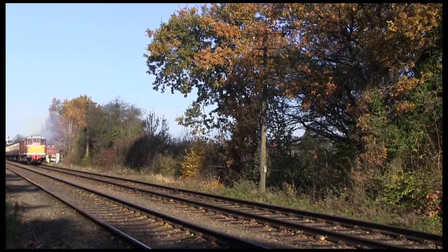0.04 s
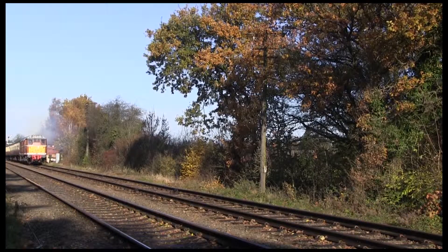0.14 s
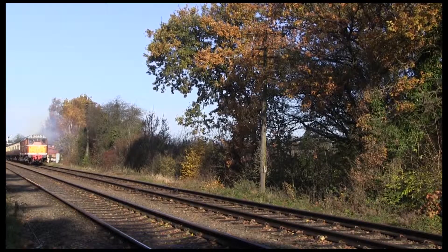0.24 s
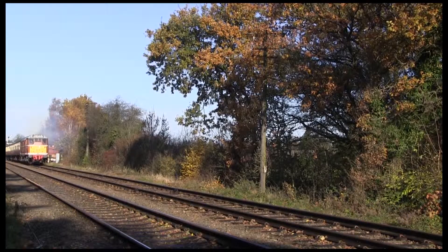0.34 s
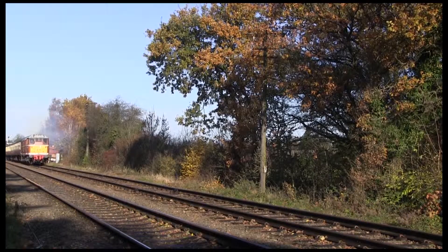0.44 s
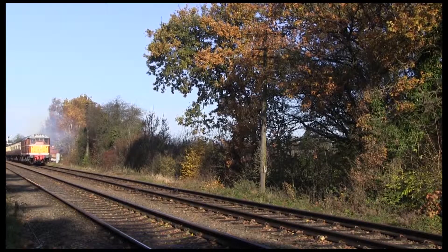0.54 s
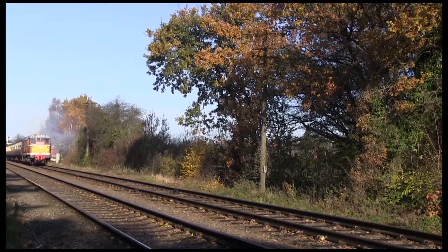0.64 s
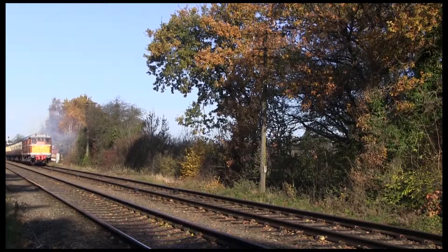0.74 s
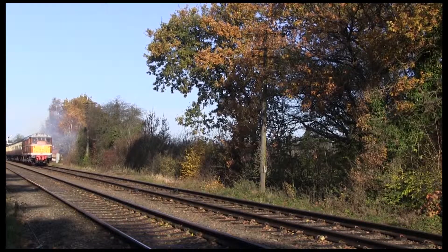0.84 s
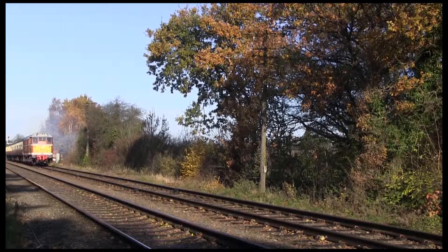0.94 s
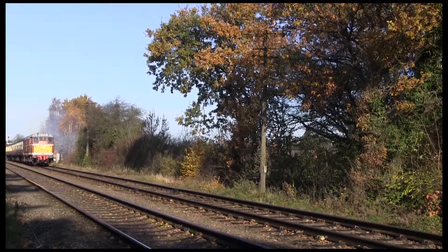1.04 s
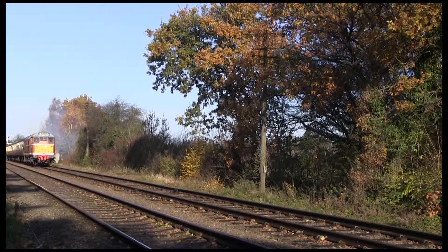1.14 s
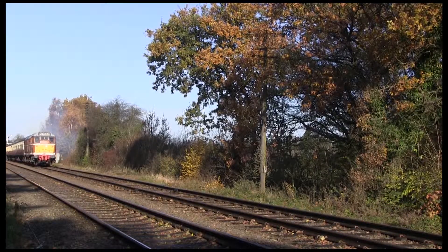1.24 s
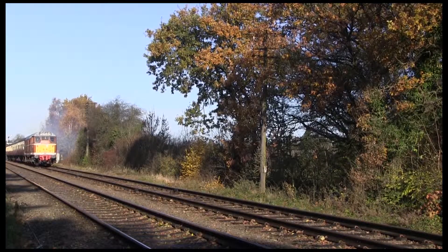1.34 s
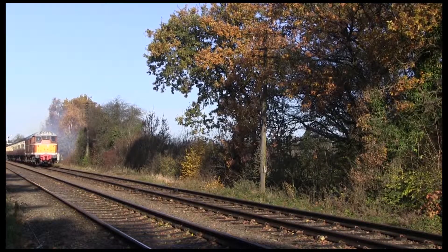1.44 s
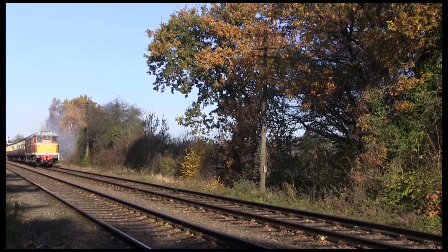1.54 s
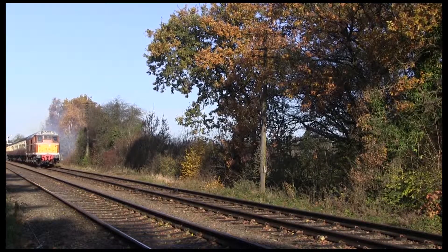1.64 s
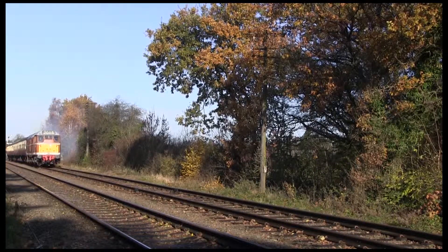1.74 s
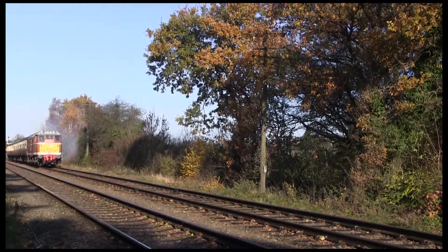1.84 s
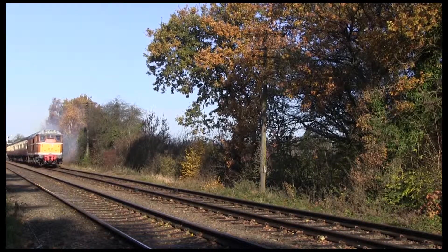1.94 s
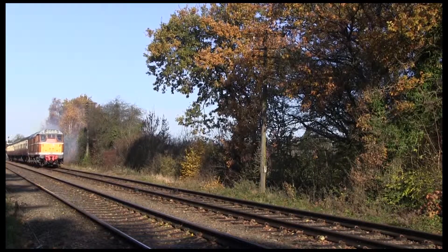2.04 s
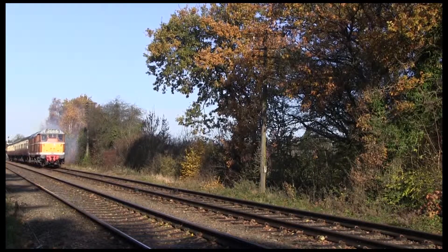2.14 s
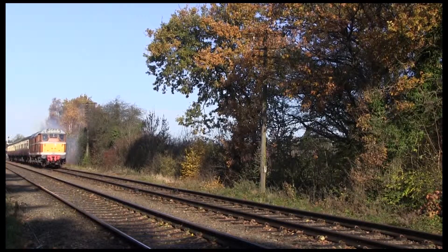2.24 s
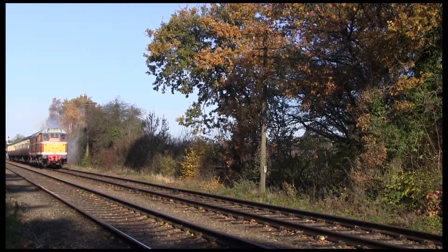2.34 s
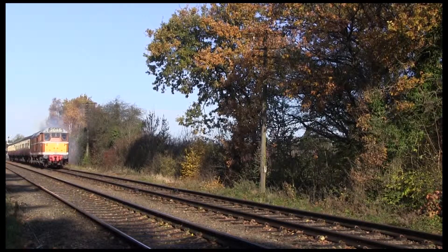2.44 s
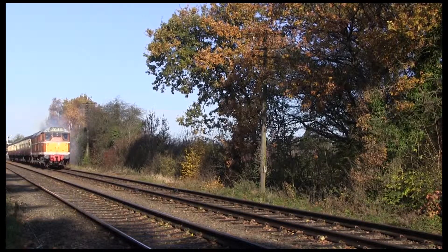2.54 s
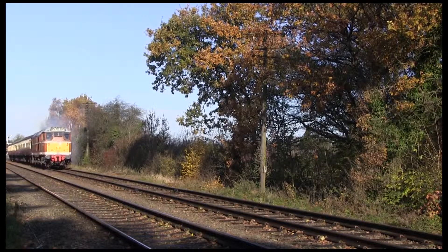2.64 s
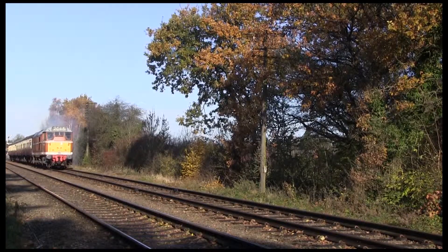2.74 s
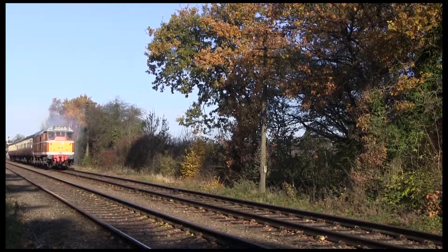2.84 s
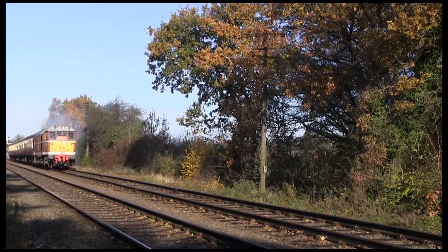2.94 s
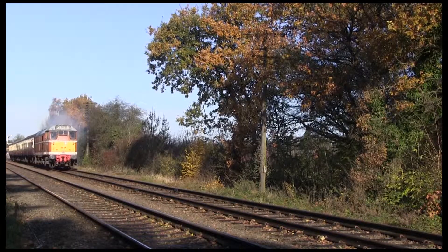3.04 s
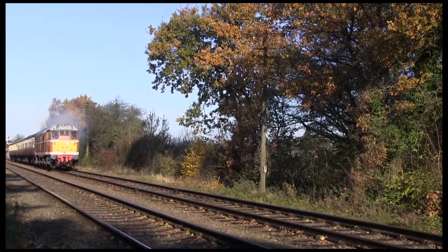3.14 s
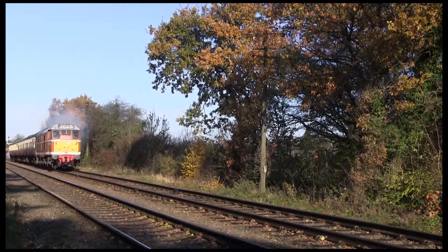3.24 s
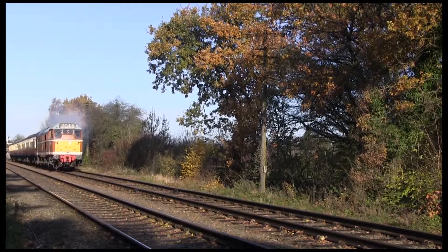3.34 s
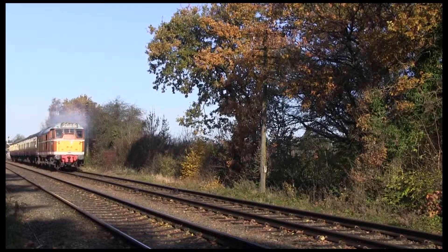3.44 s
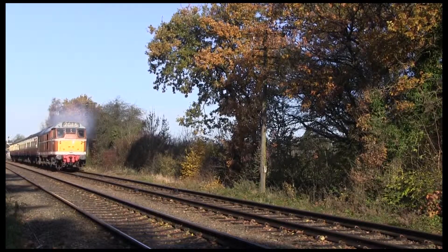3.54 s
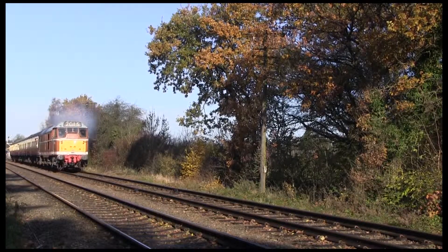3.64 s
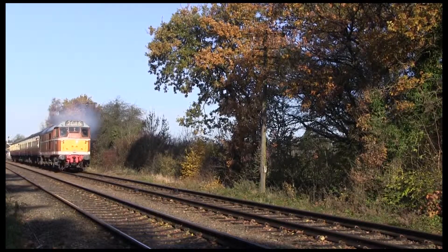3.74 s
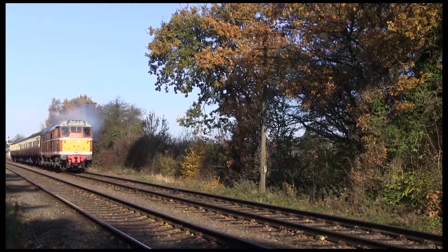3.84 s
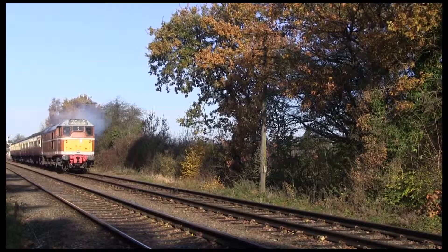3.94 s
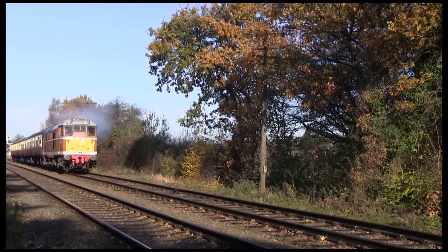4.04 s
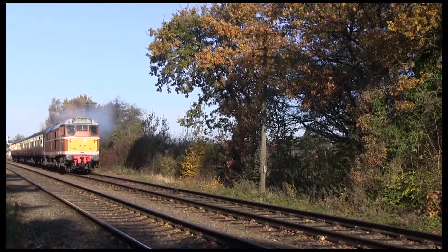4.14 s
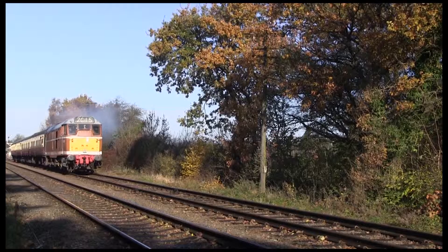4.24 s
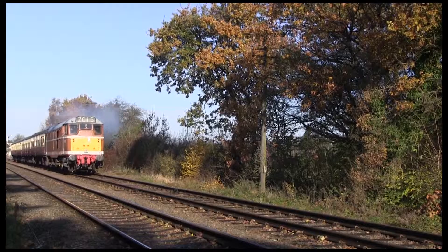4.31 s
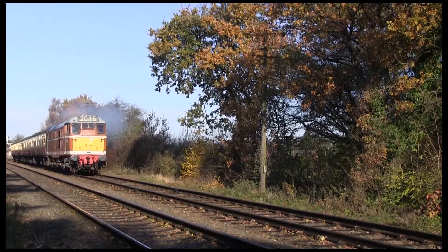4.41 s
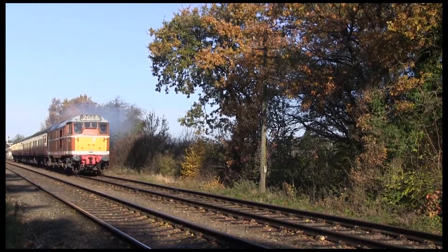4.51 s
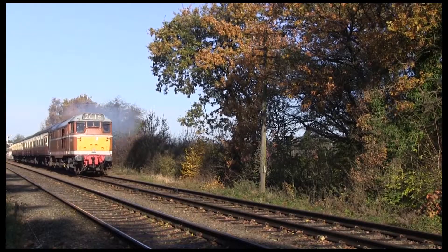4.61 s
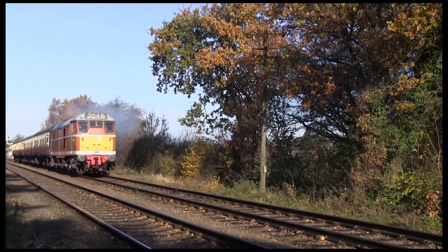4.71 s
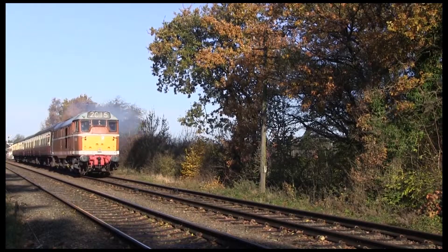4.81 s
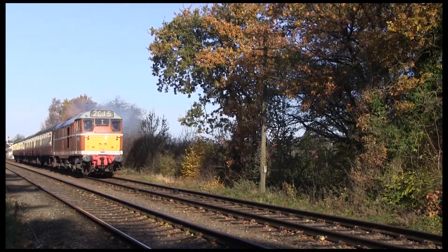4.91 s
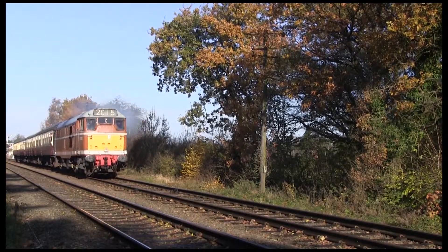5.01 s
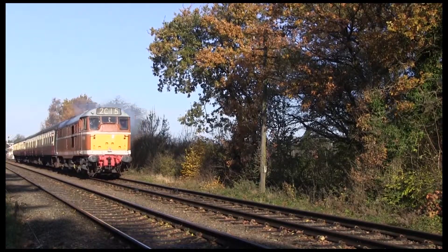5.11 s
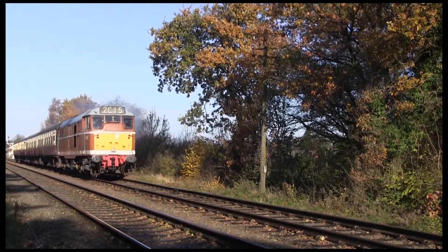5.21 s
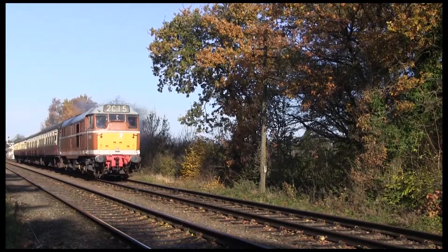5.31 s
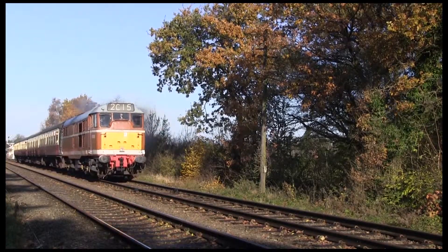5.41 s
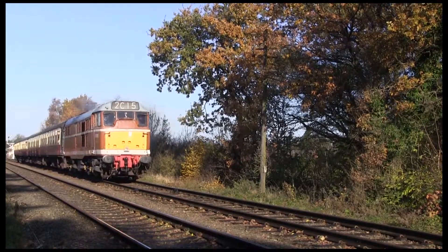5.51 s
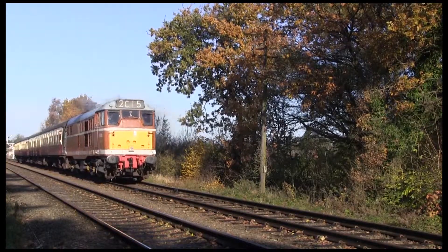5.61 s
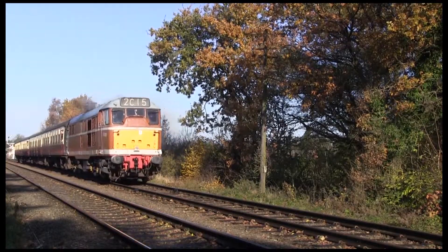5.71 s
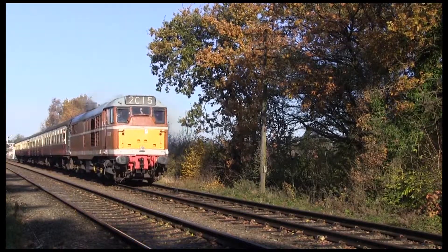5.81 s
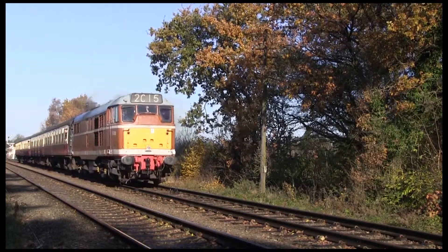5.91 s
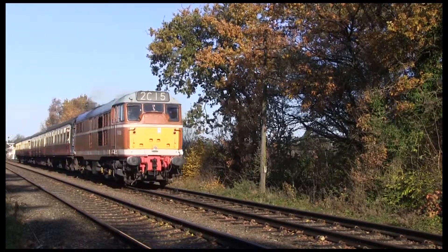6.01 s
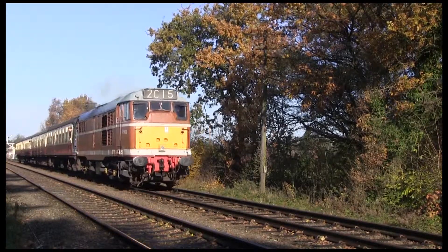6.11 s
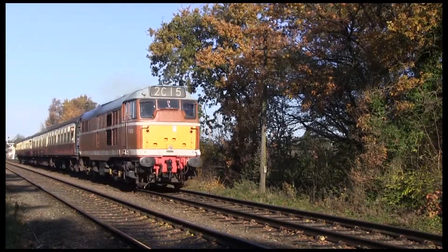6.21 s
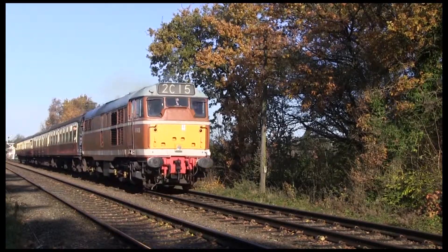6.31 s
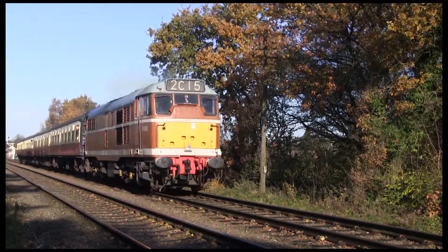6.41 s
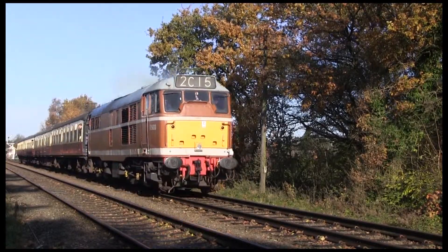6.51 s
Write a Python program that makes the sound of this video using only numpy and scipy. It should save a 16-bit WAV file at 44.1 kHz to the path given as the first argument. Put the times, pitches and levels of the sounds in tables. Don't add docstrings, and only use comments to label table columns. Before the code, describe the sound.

A diesel locomotive under full power approaches along the track, its lumpy fast exhaust throb and rough gas roar swelling to a loud, barking close.

```python
import sys
import numpy as np
from scipy import signal
from scipy.io import wavfile
from scipy.ndimage import uniform_filter1d

SR = 44100
rng = np.random.default_rng(int(sys.argv[2]) if len(sys.argv) > 2 else 0)


def bounce(signal):
    frames = np.transpose(np.atleast_2d(signal))
    limited = np.clip(frames, -1, 1)
    pcm = np.round(limited * 32767).astype(np.int16)
    wavfile.write(sys.argv[1], SR, pcm)


def amplitude_ratio(level_db):
    exponent = np.asarray(level_db, float) / 20
    return 10 ** exponent


N = 289296
T = np.arange(N) / SR

# (crank angle [deg], strength [dB])
NEAR_PUFFS = [(6, .5), (128, .3), (241, -.5), (370, 0), (484, -1), (610, .2)]


def level(x, db):
    return x * amplitude_ratio(db) / np.sqrt(np.mean(x ** 2))


def band(x, lo_hz, hi_hz):
    return signal.sosfilt(signal.butter(2, [lo_hz, min(hi_hz, .45 * SR)], "band", fs=SR, output="sos"), x)


def lowpass(order, hz):
    return signal.butter(order, hz, fs=SR, output="sos")


def ring(x, hz, width):
    return signal.lfilter(*signal.iirpeak(hz, hz / width, SR), x)


def clicks(s, size):
    at = np.clip(s * SR, 0, N - 2)
    k = at.astype(int)
    return np.bincount(k, size * (1 - at + k), N) + np.bincount(k + 1, size * (at - k), N)


def burst(x, rise_s, fall_s):
    for s in (rise_s, fall_s):
        x = signal.lfilter([1], [1, -np.exp(-1 / (s * SR))], x)
    return x / (rise_s * SR)


def walk(rate):
    k = int(SR / rate)
    held = np.repeat(rng.standard_normal(N // k + 1), k)
    return 1.92 * uniform_filter1d(uniform_filter1d(held, k), k)[:N]


def firings(bank):
    # (time [s], firings of all twelve cylinders [1/s])
    firing_rate = [
        (0.0, 93.08),
        (0.82, 93.15),
        (1.64, 92.93),
        (2.46, 92.62),
        (3.28, 92.31),
        (4.1, 92.14),
        (4.92, 92.19),
        (5.74, 92.47),
        (6.56, 92.66),
    ]
    cycles = np.cumsum(np.interp(T, *np.transpose(firing_rate))) / SR / 12
    degrees, db = np.transpose(bank)
    at = (np.arange(int(cycles[-1]) + 1)[:, None] + degrees / 720).ravel()
    heard = at < cycles[-1]
    return np.interp(at, cycles, T)[heard], np.resize(db, len(at))[heard]


def thump():
    # (crank angle at which the pulse leaves the stack [deg], strength [dB])
    near_bank = [(6.0, 2.1), (133.0, 0.8), (239.1, -4.6), (368.4, 1.9), (509.5, -1.3), (610.3, 1.0)]
    far_bank = [(45.4, -5.9), (166.2, -1.0), (273.9, 4.1), (407.3, 4.7), (506.5, -0.8), (637.1, -1.0)]
    # (frequency [Hz], width [Hz], level [dB], polarity [+1 or -1])
    near_stack = [(56.6, 12.5, 2.6, 1), (95.9, 53.6, 22.0, -1), (108.0, 54.2, 19.9, 1),
                  (235.2, 172.5, -5.8, 1)]
    far_stack = [(65.7, 12.5, 17.9, 1), (99.9, 75.6, 9.7, -1), (139.9, 21.9, 12.0, 1),
                 (254.7, 30.0, -1.8, 1)]
    # (level at the start [dB], rise [dB/s], extra rise [dB/s^2])
    deep_rise, body_rise, upper_rise = (-44, 1.91, 0.001), (-36.5, 1.33, 0.001), (-51, 1.51, 0.38)
    cancel_from_s, cancel_db_per_s = 4.84, 2.5

    out = 0
    for bank, stack in ((near_bank, near_stack), (far_bank, far_stack)):
        s, db = firings(bank)
        chance = rng.standard_normal((len(s), 2)).T
        pulses = clicks(s + .0001 * chance[0], amplitude_ratio(db + .35 * chance[1]))
        out = out + sum(sign * amplitude_ratio(g) * ring(pulses, hz, width) for hz, width, g, sign in stack)

    below = [signal.sosfiltfilt(lowpass(4, hz), out) for hz in (35, 80, 165, 420)]
    deep, body, upper = np.diff(below, axis=0)
    deep_db, body_db, upper_db = (a + b * T + c * T ** 2 for a, b, c in (deep_rise, body_rise, upper_rise))
    body_db = body_db - cancel_db_per_s * np.maximum(0, T - cancel_from_s)
    rumble = level(band(rng.standard_normal(N), 60, 170), -23)
    blur = level(band(rng.standard_normal(N), 170, 330), -7.5) * amplitude_ratio(1.0 * walk(12))

    deep_part = level(deep, 0.45) * amplitude_ratio(deep_db)
    body_part = (level(body, -0.37) + rumble) * amplitude_ratio(body_db)
    upper_part = (level(upper, -3.84) + blur) * amplitude_ratio(upper_db)
    return deep_part + body_part + upper_part


def air_db(hz):
    # (time [s], half length [s], centre [Hz], level [dB])
    air_swells = [(0.865, 0.18, 1050, -2.6), (0.92, 0.11, 260, 6.5), (1.371, 0.05, 5380, 3.5),
                  (1.7, 0.16, 850, -2.5), (1.895, 0.079, 3070, 2.5), (2.152, 0.085, 3000, 5.5),
                  (2.173, 0.05, 1110, -3.5), (2.72, 0.14, 3190, 2), (2.794, 0.097, 610, 2),
                  (3.027, 0.06, 2560, -3.5), (3.2, 0.045, 5450, -6.0), (3.34, 0.49, 6560, 4.5),
                  (3.514, 0.16, 1230, -3), (3.52, 0.73, 1160, 7), (3.923, 0.052, 1560, -4.5),
                  (6.058, 0.13, 1310, -3), (6.242, 0.36, 7380, 5.5), (6.283, 0.41, 1870, 10)]
    faint_swells = [
        (0.12, 0.096, 300, -1),
        (0.3, 0.13, 1200, 1.5),
        (2.55, 0.13, 7500, -1),
        (3.1, 0.096, 1100, 1.5),
        (4.25, .12, 5500, 2),
        (4.95, 0.072, 2080, 2.5),
        (5.707, 0.18, 3300, 2),
        (5.8, 0.18, 520, -0.5),
    ]
    s, half_s, mid_hz, db = np.transpose(air_swells + faint_swells)
    coarse_t = T[::100]
    in_time = np.exp(-.5 * ((coarse_t[:, None] - s) / half_s) ** 2)
    octaves_off = np.log2(hz / mid_hz)
    in_pitch = np.exp(-.5 * (octaves_off / .8) ** 2)
    return np.interp(T, coarse_t, in_time @ (db * in_pitch))


def gas():
    # (frequency [Hz], density [dB per Hz])
    gas_colour = [(300, -5), (400, -3.5), (550, -0.5), (750, -3), (1100, -10), (1400, -9), (2000, -12.5),
                  (2900, -10), (4200, -14), (5200, -27.5), (7000, -31), (9500, -34), (11500, -46),
                  (13500, -50)]
    # (frequency [Hz], width [Hz], level [dB])
    panels = [(557, 35, -7), (731, 30, -7), (961, 52, -6), (1260, 51, -12.5), (1615, 34, -15)]
    group_hz, group_edges_hz = [460, 1050, 2800, 7500], [700, 1600, 5000]
    group_mid_db, group_db_per_s = [-44, -46.5, -47, -61], [4.09, 2.81, 2.64, 3.45]
    puff_strength = [0.83, 6.5, 1.0, 4.3]
    bark_db, bark_db_per_s, bark_per_swell_db = -2.5, 0.1, 1.06

    fired, puff_db = firings(NEAR_PUFFS)
    hz_points, db_points = np.transpose(gas_colour)
    centres = 340 * 2 ** (np.arange(17) / 3)
    colour = amplitude_ratio(np.interp(np.log(centres), np.log(hz_points), db_points)) * np.sqrt(centres)
    group = np.searchsorted(group_edges_hz, centres)
    colour /= np.sqrt(np.bincount(group, colour ** 2))[group]

    from_middle_s = T - T[-1] / 2
    force, shared, out = rng.standard_normal(len(fired)), 0, 0
    for hz, gain, k in zip(centres, colour, group):
        place = np.interp(np.log(hz), np.log(group_hz), range(4))
        path_db = air_db(hz)
        rise_db_per_s = np.interp(place, range(4), group_db_per_s)
        moving_db = group_mid_db[k] + rise_db_per_s * from_middle_s + path_db
        moving_db = moving_db + 1.5 * max(0, np.log2(hz / 9000)) * group_db_per_s[3] * from_middle_s
        bark = bark_db + bark_db_per_s * from_middle_s + bark_per_swell_db * path_db
        shared = .6 * shared + .8 * rng.standard_normal(len(fired))
        chance_db = .4 * force + 1.5 * shared
        puffs = clicks(fired + 0.00059 + 0.0017 * place, amplitude_ratio(chance_db + puff_db + np.interp(fired, T, bark)))
        flow = burst(puffs, 0.0016, .0055 - 0.00067 * place)
        flow = flow * amplitude_ratio(np.interp(place, range(4), puff_strength))
        noise = band(rng.standard_normal(N), hz / 2 ** (1 / 6), hz * 2 ** (1 / 6))
        envelope = amplitude_ratio(1.0 * walk(25)) + flow
        slow_level = np.sqrt(uniform_filter1d(envelope ** 2, size=SR // 4))
        envelope = envelope / slow_level * amplitude_ratio(1.08 * walk(6))
        out = out + level(noise * envelope, 0) * gain * amplitude_ratio(moving_db)

    out = out + sum(amplitude_ratio(db) * ring(out, hz, width) for hz, width, db in panels)
    treble_db = group_mid_db[3] + group_db_per_s[3] * from_middle_s + air_db(group_hz[3])
    return out + turbo(fired) * amplitude_ratio(treble_db)


def turbo(fired):
    # (time [s], centre [Hz], level against the treble of the gas [dB])
    turbo_path = [
        (0, 9330, -14),
        (1.5, 9480, -12.5),
        (3.199, 9860, -8),
        (5.001, 10070, -4.5),
        (6.56, 10680, -5.5),
    ]
    s, hz, db = np.transpose(turbo_path)
    turn = 2 * np.pi * np.cumsum(np.interp(T, s, hz)) / SR
    a, b = signal.sosfilt(lowpass(2, 550), rng.standard_normal((2, N)))
    hiss = a * np.cos(turn) + b * np.sin(turn)
    chance_db = 3.5 * rng.standard_normal(len(fired))
    throb = 1 + 2.0 * burst(clicks(fired + 0.0031, amplitude_ratio(chance_db)), 0.0015, 0.0032)
    return level(hiss * throb, 0) * amplitude_ratio(np.interp(T, s, db))


def pops():
    # (time [s], peak [dB], low part against the peak [dB], centre of the low part [Hz])
    hard_pops = [(2.1311, -24, -14, 1580), (2.1524, -29, -12, 730), (2.2824, -28, -8, 940),
                 (2.6753, -29, -14.5, 766), (2.7372, -31.5, 2.5, 770), (2.803, -28.5, -11, 603),
                 (2.8464, -35, 12, 970), (2.9754, -33.5, 5, 880), (3.1936, -34, 8, 1310),
                 (3.258, -35, 8, 1290), (3.3887, -27, -7, 693), (3.7134, -40, 11, 730),
                 (3.7564, -26.5, -6, 1310), (3.7778, -30, -6, 860), (4.4737, -28, -7, 740),
                 (4.797, -30, -7, 764), (4.8414, -25, 1.5, 610), (5.4485, -23.5, 4, 670),
                 (5.5344, -31, 10, 676), (5.7484, -22.5, 3.5, 684), (5.881, -18.5, -12, 625),
                 (5.9673, -20.5, -3, 740), (6.1619, -17.5, -3, 754), (6.2277, -16, -4, 677),
                 (6.2477, -19, 0.5, 1620), (6.3565, -24, 6.5, 670), (6.3774, -17, -1, 710),
                 (6.4233, -14, -8, 1310), (6.5091, -15.5, -8, 1430), (6.5286, -20, -1, 974)]
    # (time [s], peak [dB])
    treble_spits = [(2.1524, -56), (2.1794, -62), (3.0864, -43.5), (3.1047, -39), (3.3657, -42),
                    (3.3887, -49), (3.4325, -45), (3.4765, -43), (3.498, -44), (3.628, -50),
                    (5.7484, -47.5), (6.0975, -50), (6.2277, -40), (6.2477, -35), (3.3045, -50),
                    (3.347, -50), (2.1985, -53)]
    s, db, low_db, low_hz = np.transpose(hard_pops)
    spit_s, spit_db = np.transpose(treble_spits)
    out = 0
    for lo_hz, hi_hz, hits in ((1570, 3470, clicks(s, amplitude_ratio(db - 5.5))),
                               (4800, 9000, clicks(spit_s, amplitude_ratio(spit_db)))):
        noise = level(band(rng.standard_normal(N), lo_hz, hi_hz), 0)
        out = out + noise * burst(hits, 0.0012, 0.0043)

    age = np.arange(1200) / SR
    shape = (age / 0.0023) * np.exp(1 - age / 0.0024)
    rings = amplitude_ratio(db + low_db - 4.5)[:, None] * np.sin(2 * np.pi * low_hz[:, None] * age) * shape
    at = (s * SR).astype(int)[:, None] + np.arange(len(age))
    return out + np.bincount(at.ravel(), rings.ravel(), N)[:N]


def chuffs():
    # (start [s], end [s], first pitch [Hz], last pitch [Hz], peak [dB])
    chuff_runs = [
        (2.68, 3.32, 877, 1355, -35.5),
        (3.62, 4.65, 850, 1140, -38),
        (5.7, 6.1, 1495, 2300, -33.5),
        (6.1, 6.65, 1405, 1595, -29.5),
    ]
    rise_s, late_s, fade_s = 0.0029, .001, .08
    pitch_spread, scatter_db = .15, 2

    fired, db = firings(NEAR_PUFFS)
    chance = rng.standard_normal((len(fired), 3)).T
    age = np.arange(800) / SR
    shape = age / rise_s * np.exp(1 - age / rise_s)
    at = ((fired + late_s) * SR).astype(int)[:, None] + np.arange(len(age))
    out = 0
    for s0, s1, first_hz, last_hz, peak_db in chuff_runs:
        hz = np.interp(fired, [s0, s1], [first_hz, last_hz]) * np.exp(pitch_spread * chance[0])
        fade = np.clip(np.minimum(fired - s0, s1 - fired) / fade_s, 0, 1)
        size = fade * amplitude_ratio(peak_db + db + scatter_db * chance[1])
        tone = np.sin(2 * np.pi * hz[:, None] * age + 2 * chance[2][:, None])
        out = out + size[:, None] * shape * tone
    return np.bincount(at.ravel(), out.ravel(), N)[:N]


def scene():
    heard = amplitude_ratio(4.5) * (thump() + gas() + pops() + chuffs())
    return np.array([0 * heard, heard])


def top_cut(x):
    return signal.sosfilt(signal.butter(12, 15710, fs=SR, output="sos"), x)


def record(dry):
    right = signal.sosfilt(signal.butter(4, 40, "high", fs=SR, output="sos"), dry[1])
    left = -1.2 / SR * signal.lfilter([1], [1, -np.exp(-2 * np.pi * 8.0 / SR)], right)
    hiss = amplitude_ratio(np.array([[-79], [-86]])) * rng.standard_normal((2, N))
    treble_cut = signal.ellip(8, .2, 90, 15700, fs=SR, output="sos")
    mix = signal.sosfilt(treble_cut, np.array([left, right]) + hiss)
    return top_cut(mix)


dry = scene()
out = record(dry)
bounce(out)
```